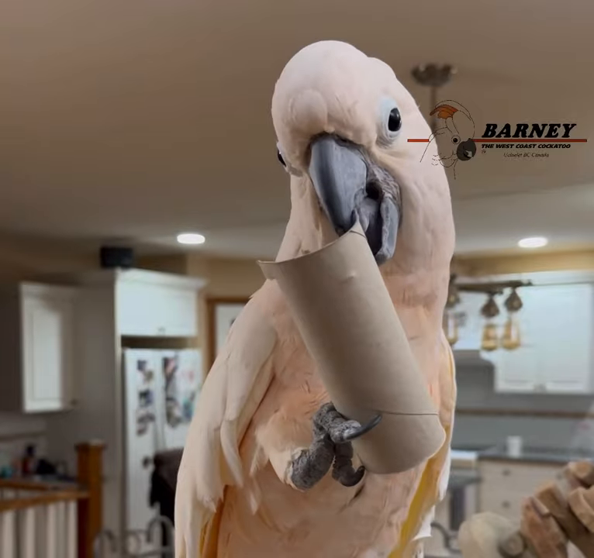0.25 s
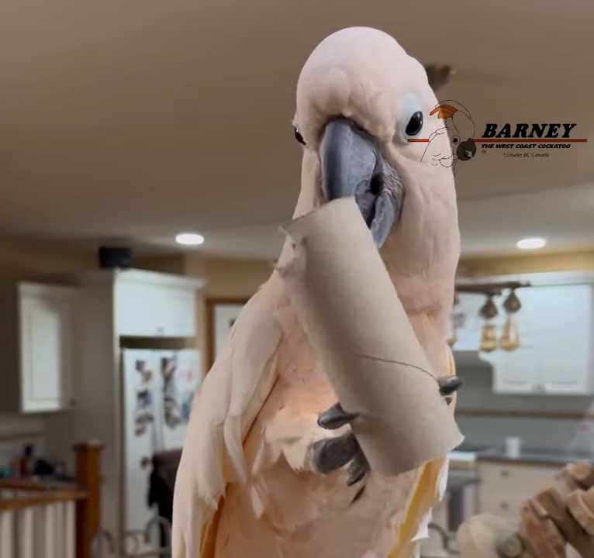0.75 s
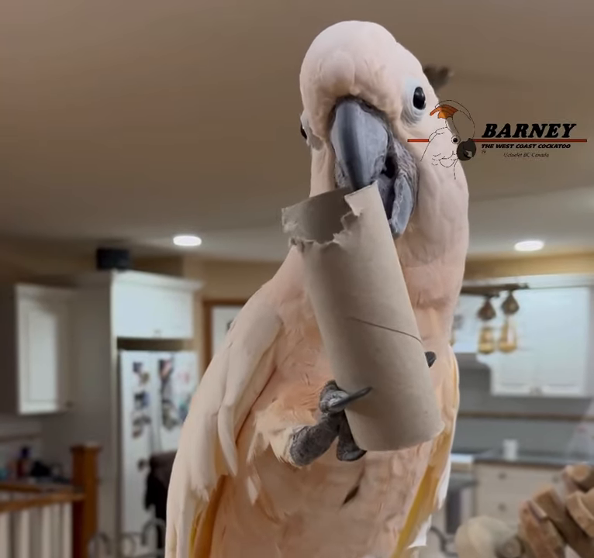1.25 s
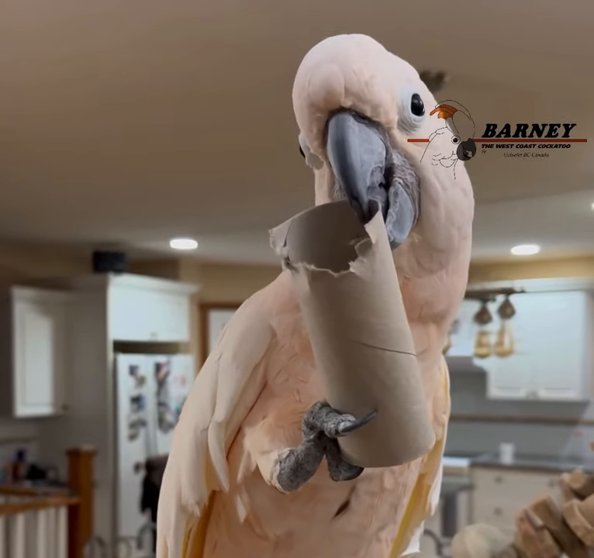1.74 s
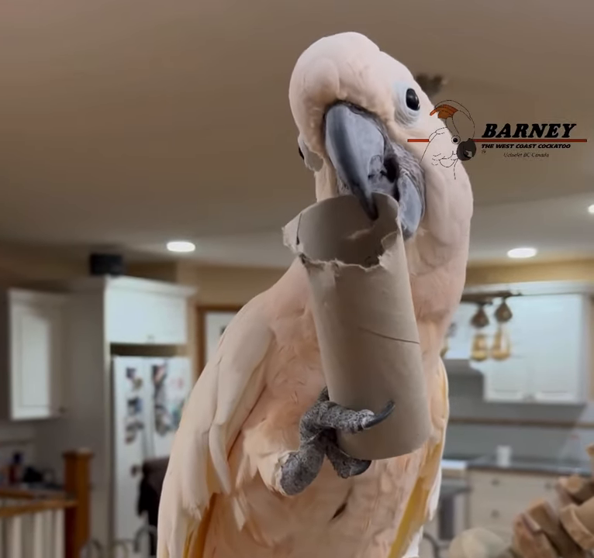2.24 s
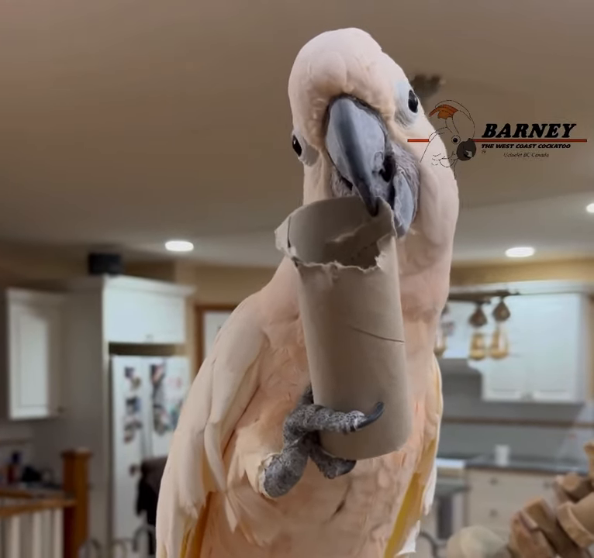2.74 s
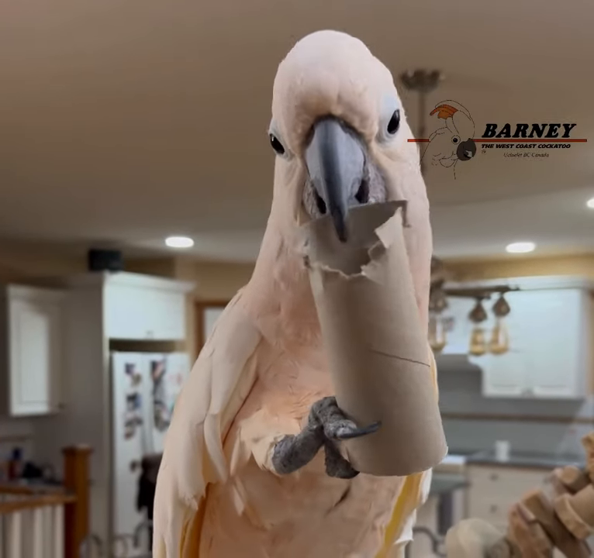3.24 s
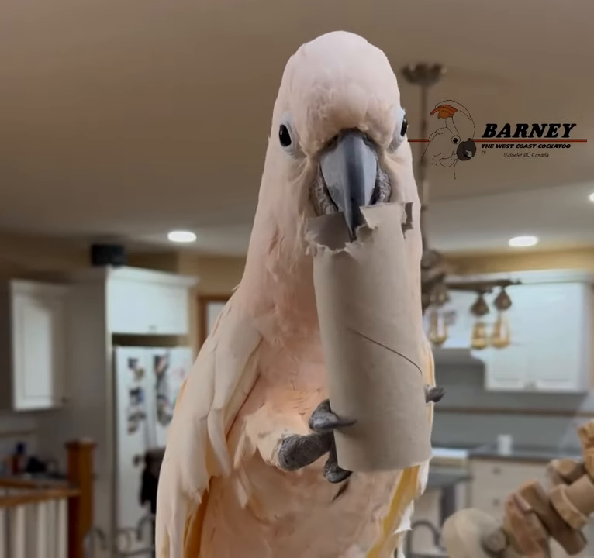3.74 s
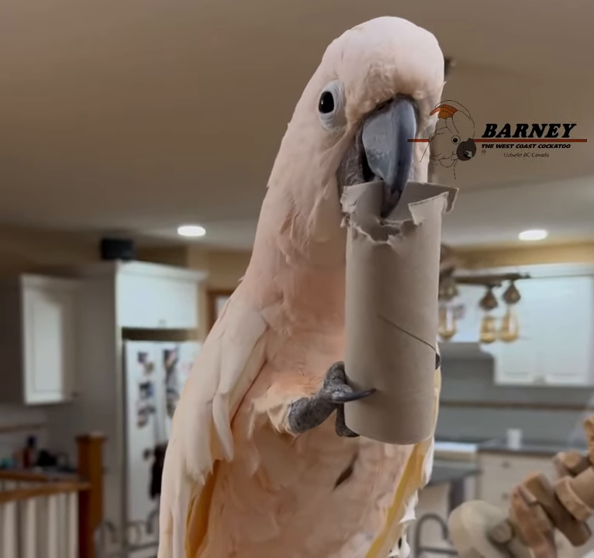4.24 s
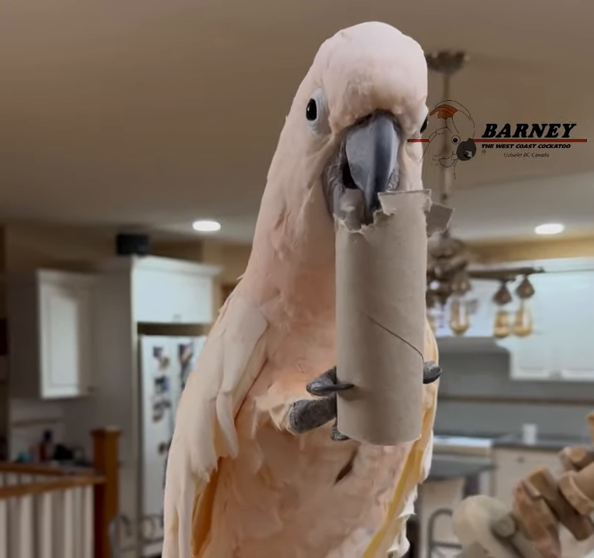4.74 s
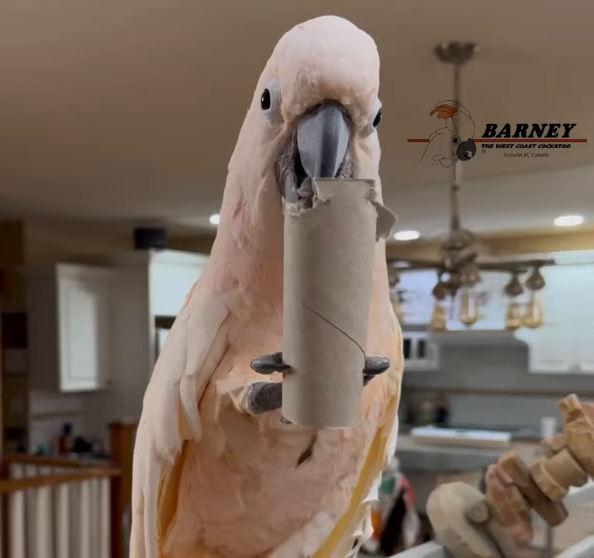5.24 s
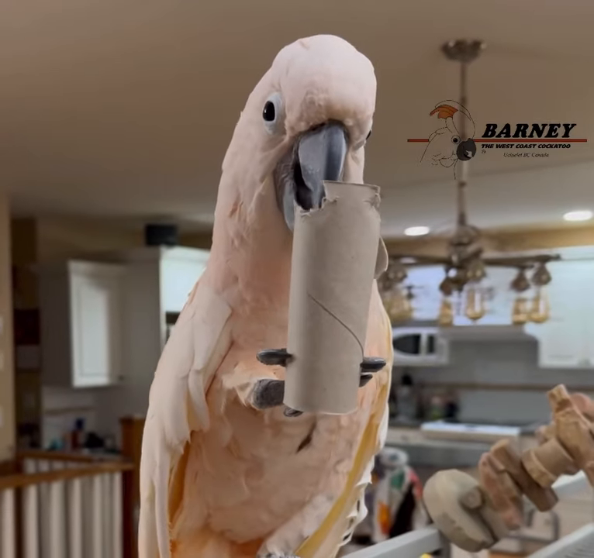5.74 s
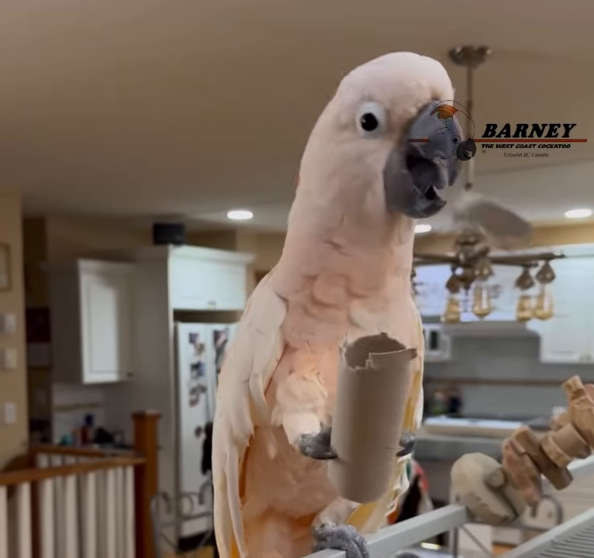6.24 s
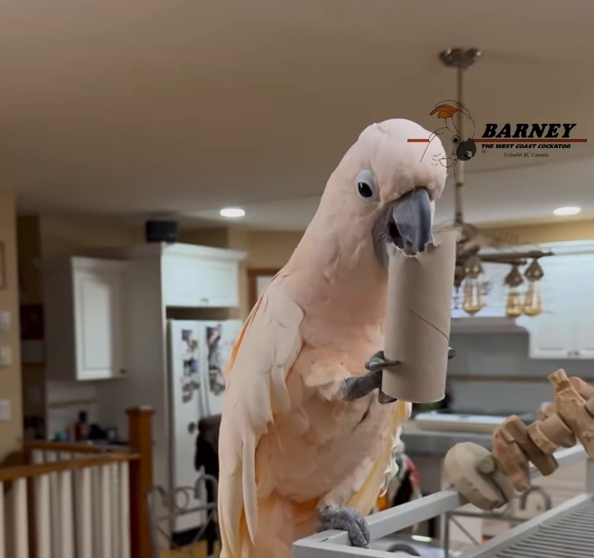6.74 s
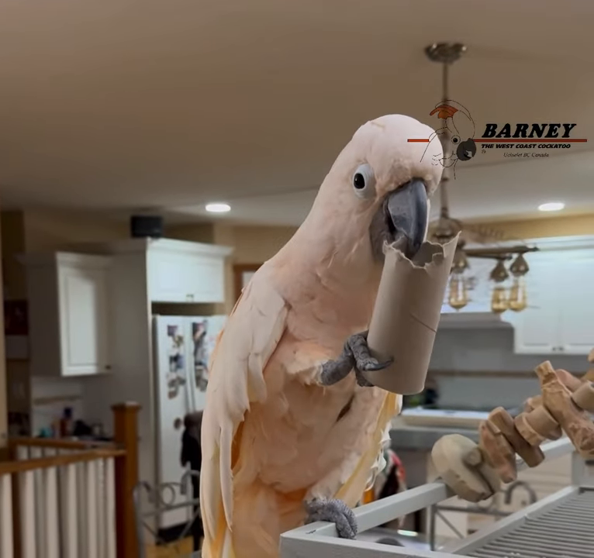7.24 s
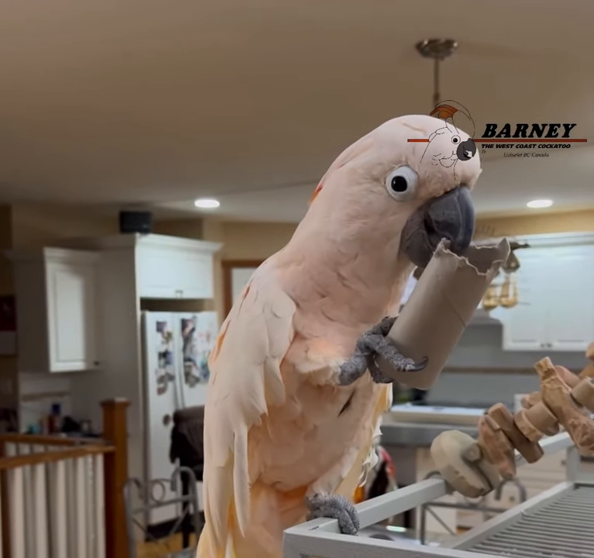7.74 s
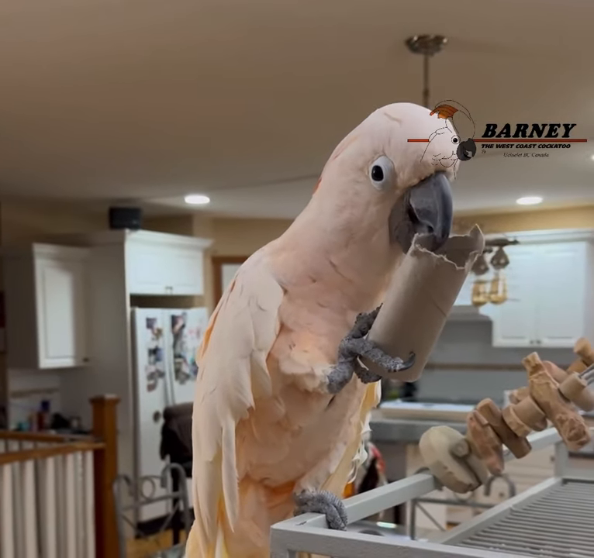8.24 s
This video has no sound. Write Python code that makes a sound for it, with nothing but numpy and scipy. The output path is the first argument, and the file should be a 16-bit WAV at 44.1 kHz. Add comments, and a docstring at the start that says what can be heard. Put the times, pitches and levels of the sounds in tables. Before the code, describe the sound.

A cockatoo chews the rim of a cardboard tube close to the microphone. Small hollow snaps and crunches come in uneven clusters, mixed with dry ticks, short beak scrapes and ripping paper fibres. About three seconds in, the tube caves in with one loud hollow pop, then the nibbling and tearing carry on. The kitchen adds a light echo and a low, steady hum of air.

```python
"""Crackling, crunching and hollow snaps: a cockatoo chews the rim of a cardboard tube in a kitchen.
As its beak pulls, nibbles and scrapes, paper fibres rip, the layers of card crunch and snap,
and the hollow tube rings along. Once, the wall of the tube caves in with a loud pop.
The kitchen echoes it all over a low hum of background air."""
import sys
import numpy as np
from scipy import signal
from scipy.fft import rfft, irfft, next_fast_len
from scipy.io import wavfile
from scipy.ndimage import uniform_filter1d

SR = 44100
rng = np.random.default_rng(int(sys.argv[2]) if len(sys.argv) > 2 else 0)


def bounce(signal):
    """Save signal as a 16-bit WAV file at the path given by the first command-line argument."""
    frames = np.transpose(np.atleast_2d(signal))
    limited = np.clip(frames, -1, 1)
    pcm = np.round(limited * 32767).astype(np.int16)
    wavfile.write(sys.argv[1], SR, pcm)


N = 373968
TIME = np.arange(N) / SR
LEFT_LAG_S = .00059  # sound from the bird's side reaches the left channel this much later

# snaps of the rim under the beak: (time [s], crack level [dB], tube ring level [dB])
RIM_SNAPS = [(.141, -64, -57.5), (0.3377, -55.5, -48), (0.51, -57, -51), (0.567, -46, -45),
             (0.5727, -54, -42), (.578, -59, -43), (0.583, -60, -43), (.619, -58, -47.5),
             (0.6876, -55, -46), (.704, -71, -50), (.73, -57, -43.5), (0.7384, -57, -44.5),
             (0.7802, -56, -56), (0.7854, -64, -48.5), (.824, -68, -54), (.858, -53.5, -52),
             (.952, -55, -52), (1.1476, -48, -55.5), (1.465, -68, -54.5), (1.9466, -32, -64),
             (2.003, -41.5, -51), (2.0115, -44.5, -52), (2.398, -47, -54.5), (2.528, -51, -58),
             (2.623, -49, -49), (2.63, -44, -48.5), (3.1142, -51.5, -49.5), (3.1346, -48, -48.5),
             (3.2697, -56, -48), (3.671, -62, -52), (3.7205, -53, -51), (3.768, -56.5, -55),
             (3.779, -54.5, -44.5), (3.9898, -42.5, -51.5), (3.994, -44, -54), (4.239, -29.5, -40.5),
             (4.2484, -48, -56), (4.348, -46.5, -54), (4.468, -73, -55.5), (4.711, -39, -41),
             (4.7135, -32, -41.5), (4.824, -65, -56), (5.239, -53, -52.5), (5.305, -48.5, -50.5),
             (5.457, -66, -53.5), (5.474, -64, -54.5), (5.8914, -46.5, -49), (5.8984, -45, -48.5),
             (5.915, -63, -54), (6.015, -42.5, -38.5), (6.038, -57, -51), (6.479, -59.5, -68),
             (6.668, -69, -49), (6.8885, -66.5, -57.5), (7.001, -41.5, -58.5), (7.0989, -46.5, -55),
             (7.358, -44.5, -59), (7.376, -44.5, -59), (7.621, -68, -53), (7.86, -57, -58),
             (7.914, -47, -60), (7.9319, -48, -53.5), (8.098, -55, -49.5), (8.402, -53, -53.5),
             (8.4241, -47, -63)]
# the tube's main note shifts as the beak squeezes and shortens it: (time [s], pitch [Hz])
TUBE_NOTE = [(0.7, 1275), (1.2, 1370), (2.6, 1437), (3.3, 1261), (3.7, 1393), (4.25, 1309), (4.72, 1449),
             (5.2, 1370), (6.0, 1362), (6.7, 1290), (7.5, 1386), (8.4, 1402)]
# tone of card being crushed: (frequency [Hz], level [dB])
CRUSH_TONE = [(100, -21.5), (250, -1), (600, 4.5), (1000, 1), (1900, -1), (2750, -0.5), (3500, -6),
              (5500, 0), (16000, -34.5)]


def gain_of(db):
    """Turns decibels into a factor to multiply a sound by."""
    return 10 ** (np.asarray(db) / 20)


def evened(x):
    """Scales a sound to an average power of 1."""
    return x / np.sqrt(np.mean(x ** 2) + 1e-20)


def burst(x):
    """Scales a short sound to the energy of 10 ms at power 1."""
    return evened(x) * np.sqrt(SR / 100 / x.shape[-1])


def read(points, hz):
    """Looks up a value between a table's rows, on a logarithmic frequency scale."""
    f, value = np.transpose(points)
    return np.interp(np.log(hz + 1), np.log(f + 1), value)


def colour(x, tone):
    """Turns each frequency up or down as a tone table says."""
    size = next_fast_len(x.shape[-1] + 512)
    gains = gain_of(read(tone, np.fft.rfftfreq(size, 1 / SR)))
    return irfft(rfft(x, size) * gains, size)[..., :x.shape[-1]]


def add(mix, s, sound):
    """Mixes a sound in, starting at s seconds."""
    part = mix[:, max(round(s * SR), 0):][:, :sound.shape[1]]
    part += sound[:, :part.shape[1]]


def pair(size, likeness):
    """Left and right hiss: unrelated at likeness 0, the same at 1."""
    a, b = rng.standard_normal((2, size))
    return np.array([a, likeness * a + np.sqrt(1 - likeness ** 2) * b])


def leaning(right_db):
    """Left and right gains that move a sound sideways and keep its total power."""
    return evened(gain_of([[-right_db / 2], [right_db / 2]]))


def air(drone_hz=74):
    """Steady low noise of the house, with a faint drone."""
    tone = [(24, -26), (48, -5.5), (80, 2.5), (110, -4), (250, 0.5), (340, -7.5), (650, -6.5), (900, -17),
            (3000, -31), (6000, -41), (15000, -39)]  # tone of the noise: (frequency [Hz], level [dB])
    sameness = [(70, 0.99), (280, 0.92), (640, 0), (2000, 0)]  # how alike left and right are: (frequency [Hz], likeness [0 to 1])
    a, b = rfft(rng.standard_normal((2, N)))
    likeness = read(sameness, np.fft.rfftfreq(N, 1 / SR))
    hiss = irfft(np.array([a, likeness * a + np.sqrt(1 - likeness ** 2) * b]), N)
    drone = np.sin(2 * np.pi * drone_hz * TIME)
    return gain_of(-57) * evened(colour(hiss, tone)) + gain_of(-72) * drone


def kitchen(x, size=30000):
    """The room answers with many small echoes, which die away at their own rate for each frequency."""
    fade_times = [(200, 0.3), (2000, 0.59), (7000, 0.72), (14000, 0.25)]  # how long the room rings: (frequency [Hz], time to fall 60 dB [s])
    echoes = rng.standard_normal((2, size)) * (rng.random((2, size)) < .15)
    echoes *= np.clip(TIME[:size] / .00068 - .5, 0, 1)
    hz, t, bands = signal.stft(echoes, SR, nperseg=256)
    fade = gain_of(-60 * t / read(fade_times, hz)[:, None])
    tail = signal.istft(bands * fade, SR, nperseg=256)[1]
    tail /= np.linalg.norm(tail[0])
    tail[:, round(.024 * SR)] += .25  # one clear echo from the ceiling
    return signal.fftconvolve(x, tail, axes=1)[:, :N]


def wall(x, share, ring_s=.0046, size=512):
    """The stiff card rings briefly at many close pitches, which depend on where the beak holds it."""
    ring = rng.standard_normal((2, size)) * np.exp(-TIME[:size] / ring_s)
    ring *= share / np.linalg.norm(ring[0])
    ring[:, 0] += 1  # the sound itself passes through too
    return signal.oaconvolve(x, ring, axes=1)[:, :x.shape[1]]


def regripping(x, count=5, grips_per_s=4.5):
    """The wall's ring changes as the beak moves from one grip to the next."""
    offsets = (TIME * grips_per_s - np.arange(count)[:, None]) % count - 1
    grips = np.cos(np.pi / 2 * np.clip(offsets, -1, 1))
    return sum(wall(x * grip, share=2.2) for grip in grips)


def tube(hz, right_db, damping=1, size=1024):
    """The hollow tube rings after a jolt: a few notes swell quickly and fade, the right side first."""
    # its notes: (pitch [times the main note], base width [Hz], level [dB], lean [-1 left to 1 right])
    notes = [(1.0, 178, 14.5, 1), (.77, 240, 2, 0.63), (1.2, 480, -6, 1), (2.04, 500, -5.5, 0.16)]
    t = np.maximum(TIME[:size] - np.array([[LEFT_LAG_S], [0]]), 0)
    ring = 0
    for ratio, width, db, lean in notes:
        decay = np.pi * width * damping  # a wider note dies sooner
        swell = decay ** 2 * t * np.exp(-decay * t)
        ring += gain_of(db) * leaning(right_db * lean) * swell * np.sin(2 * np.pi * ratio * hz * t)
    return ring


def fractures(per_s, spread_db, fade_s, clump_db, likeness):
    """Tiny breaks, each a short puff of hiss; they come in runs that start at once and die away."""
    sizes = gain_of(spread_db * np.minimum(rng.exponential(1, N), 3.5))
    breaks = sizes * (rng.random(N) < per_s / SR)
    power = signal.lfilter([1], [1, -np.exp(-1 / (fade_s * SR))], breaks ** 2)
    power /= abs(uniform_filter1d(power, size=900)) + 1e-9  # evens out the level over about 20 ms
    run_starts = 1. * (rng.random(N) < 70 / SR)
    runs = signal.lfilter([1], [1, -np.exp(-1 / (.012 * SR))], run_starts)
    return evened(np.sqrt(power) * gain_of(clump_db * np.tanh(runs)) * pair(N, likeness))


def scraping():
    """The edge of the beak sticks and slips on the card: short rasps that swell and fade."""
    strokes = [(1.418, 0.066, -58.5), (1.51, 0.097, -63), (6.597, 0.13, -69)]  # scrapes along the wall: (start [s], length [s], level [dB])
    tone = [(1200, -17), (2100, 1), (2650, 5), (3200, -13), (4500, -15)]  # tone of the rasp: (frequency [Hz], level [dB])
    slips = fractures(per_s=470, spread_db=2, fade_s=.00069, clump_db=3, likeness=.75)
    pressure = np.zeros((2, N))
    for start, length, db in strokes:
        arch = np.sin(np.pi * TIME[:round(length * SR)] / length)
        add(pressure, start, gain_of(db) * arch[None])
    return pressure * evened(colour(slips, tone))


def scuffing(start_s=7.3575, fade_s=.076, size=12000):
    """The rim skids across the beak: a low rasp that starts suddenly and runs out."""
    out = np.zeros((2, N))
    rasp = evened(colour(wall(pair(size, likeness=.37), share=.96), CRUSH_TONE))
    add(out, start_s, gain_of(-43.5) * rasp * np.exp(-(TIME[:size] / fade_s) ** 2))
    return out


def beak_work():
    """How hard the beak works the fibres, the layers and the tube at each moment, one row for each."""
    # the beak never quite rests: (fibres [dB], layers [dB], tube [dB])
    resting_db = [-78.5, -73, -85]
    # it pulls strips off the rim: (start [s], length [s], relative fibre level [dB], swell [dB])
    pulls = [(-.02, 0.064, -58, -24), (.136, 0.042, -53, -11), (1.116, 0.23, -54.5, 5.5),
             (1.91, .15, -55.5, 7), (2.273, 0.14, -49.5, 11.5), (2.434, 0.028, -50.5, 7),
             (2.752, 0.1, -56.5, 6), (2.837, .022, -47.5, 20), (3.93, 0.35, -58, 8),
             (4.72, 0.16, -54.5, -9), (5.129, .21, -61, 8), (5.685, .24, -60.5, -5), (5.919, .12, -51, 13),
             (6.999, .18, -59, 0), (7.14, 0.22, -60.5, 28), (7.775, 0.13, -63.5, 7),
             (7.901, 0.063, -49.5, -2), (8.265, .18, -53, 14)]
    # it bites and lets go: (start [s], length [s], relative crush level [dB], relative tube level [dB])
    nibbles = [(0.147, 0.082, -68, -50.5), (0.2, .2, -60, -61), (0.52, 0.087, -50.5, -48.5),
               (.72, 0.23, -64, -66), (0.897, 0.099, -58.5, -56), (1.39, .11, -60.5, -57.5),
               (1.506, 0.093, -59.5, -60), (1.636, .088, -65, -77), (2.107, 0.03, -55.5, -51.5),
               (2.15, 0.091, -60, -64), (2.467, .2, -60.5, -64), (2.84, 0.036, -50, -50),
               (3.563, 0.18, -64.5, -59), (4.231, 0.029, -48, -47), (4.872, .21, -64.5, -58.5),
               (5.179, .12, -63.5, -57), (5.374, 0.15, -62.5, -53), (5.58, .11, -66.5, -60.5),
               (5.937, 0.088, -57.5, -53.5), (6.254, 0.042, -66, -82), (6.589, 0.13, -67, -79),
               (6.717, 0.091, -71, -59.5), (6.983, 0.16, -58.5, -83.5), (7.393, 0.24, -66, -61),
               (7.562, .11, -62, -55), (7.998, 0.16, -59, -56), (8.267, .24, -67.5, -54)]
    # crackle around a snap, compared with that snap: (fibres [dB], layers [dB], tube [dB])
    strain_db = [-9, -12.5, -9]
    # the caved-in wall creaks and shudders as it settles: (fibres [dB], layers [dB], tube [dB])
    settling_db = [-53.5, -43, -35]
    grip_s, release_s = .014, .0089
    build_s, ease_s, settle_s = .0069, .0098, .058
    power = np.ones((3, N)) * gain_of(resting_db)[:, None] ** 2

    def stroke(start, levels_db, shape):
        """Adds the power of one movement to the three rows."""
        add(power, start, np.outer(gain_of(levels_db), shape) ** 2)

    for start, length, db, swell_db in pulls:
        t = TIME[:round((length + .15) * SR)]
        held = np.minimum(t / grip_s, 1) * np.exp(-np.maximum(t - length, 0) / release_s)
        force = held * gain_of(db + swell_db * (np.minimum(t / length, 1) - .5))
        stroke(start, [0, -17, -12], force)  # a pull mostly rips fibres
    for start, length, crush_db, shake_db in nibbles:
        arch = np.sin(np.pi * TIME[:round(length * SR)] / length)
        stroke(start, [crush_db, crush_db, shake_db], arch)
    t = TIME[:SR // 10] - .05  # time before and after a snap
    strain = np.exp(np.minimum(t / build_s, -t / ease_s))
    for s, crack_db, ring_db in RIM_SNAPS:
        bite_db = (crack_db + ring_db) / 2
        stroke(s + t[0], np.add([bite_db, bite_db, ring_db], strain_db), strain)
    stroke(2.865, settling_db, np.exp(-TIME[:SR // 2] / settle_s))
    return np.sqrt(power)


def chewing():
    """Fibres rip, layers of card crush and the tube rings under both, as hard as the beak works."""
    rip_tone = [(300, -35.5), (1500, -17), (3000, -13), (4900, -6), (6000, -3), (7200, -0.5), (9800, -4),
                (12000, -19), (15500, -7.5)]  # tone of ripping fibres: (frequency [Hz], level [dB])
    fine = fractures(per_s=1400, spread_db=0, fade_s=.00032, clump_db=11, likeness=.82)
    fine = evened(regripping(fine))
    # whole bundles of fibres part in single sharp ticks
    bundles = fractures(per_s=150, spread_db=3.5, fade_s=.0006, clump_db=5, likeness=.8)
    bundles = evened(wall(bundles, share=1.1))
    fibres = evened(colour(fine + .6 * bundles, rip_tone))
    crunch = fractures(per_s=300, spread_db=2.5, fade_s=.00082, clump_db=11.5, likeness=.71)
    layers = evened(colour(regripping(crunch), CRUSH_TONE))
    layers[0] = np.roll(layers[0], round(LEFT_LAG_S * SR))
    # the beak squeezes the tube out of round, so its pitch differs from jolt to jolt
    hz = np.interp(TIME, *np.transpose(TUBE_NOTE))
    ring = 0
    for squeeze in (.965, 1, 1.035):
        jolts = fractures(per_s=100, spread_db=5, fade_s=.00032, clump_db=13, likeness=.7)
        note = signal.hilbert(tube(hz.mean() * squeeze, right_db=10))
        ring += signal.oaconvolve(jolts, note, axes=1)[:, :N]
    drift = np.exp(2j * np.pi * np.cumsum(hz - hz.mean()) / SR)  # slides the ring along TUBE_NOTE
    ring = evened((ring * drift).real)
    rip, crush, shake = beak_work()
    return gain_of(2.13) * (rip * fibres + crush * layers) + gain_of(-2) * shake * ring


def ticking(rise_s=.00018, size=1024):
    """Thick fibres part with dry, bright ticks that leave the tube still."""
    ticks = [(.6876, -64), (.7805, -62), (1.1485, -43), (1.208, -49), (1.281, -50), (1.302, -45),
             (1.341, -45), (1.6065, -52.5), (1.9454, -34.5), (1.949, -42), (1.959, -42), (2.051, -44),
             (2.062, -44), (2.3405, -47), (2.382, -43), (2.3893, -47), (2.4407, -55), (2.748, -53.5),
             (2.8068, -46), (2.825, -47.5), (4.1917, -39.5), (4.2023, -51), (4.2185, -51), (5.2865, -44),
             (5.641, -57), (5.6475, -49), (5.7273, -53.5), (5.8067, -50), (5.981, -46), (5.992, -52),
             (7.03, -47.5), (7.315, -48), (7.802, -52), (7.812, -52), (7.8965, -52), (7.952, -47.5),
             (8.2455, -62), (8.334, -53)]  # each fibre that parts: (time [s], level [dB])
    tone = [(1000, -13), (4000, -8.5), (8000, 4), (11500, -3.5), (15500, 1)]  # tone of a tick: (frequency [Hz], level [dB])
    out, age = np.zeros((2, N)), TIME[:size] / rise_s
    for s, db in ticks:
        puff = wall(age * np.exp(-age) * pair(size, likeness=.52), share=.96)
        add(out, s, gain_of(db) * burst(colour(puff, tone)))
    return out


def flexing(flex_s=.0007):
    """The wall bends and gives a short, woody note where it folds."""
    folds = [(2.8667, -38.5, 2740), (4.2393, -44.5, 4030), (6.015, -56.5, 2700)]  # each fold: (time [s], relative level [dB], pitch [Hz])
    out, t = np.zeros((2, N)), TIME[:SR // 20]
    for s, db, hz in folds:
        note = burst(t * np.exp(-t / flex_s) * np.sin(2 * np.pi * hz * t))
        add(out, s, gain_of(db) * note * leaning(right_db=-10))
    return out


def knocking(fade_cycles=1.4):
    """Firm bites jolt the whole tube with a dull knock."""
    bites = [(1.946, -44.5, 587), (2.866, -45.5, 184), (2.867, -40.5, 673), (4.24, -50.5, 690),
             (5.559, -61, 710), (6.016, -47, 264), (7.001, -58, 910)]  # each firm bite: (time [s], level [dB], pitch [Hz])
    out, t = np.zeros((2, N)), TIME[:SR // 20]
    for s, db, hz in bites:
        knock = burst(np.exp(-t * hz / fade_cycles) * np.sin(2 * np.pi * hz * t))
        add(out, s, gain_of(db) * knock[None])
    return out


def snap(rise_s, crack_db, ring_db, hz, right_db, roughness, wall_share, damping, size=2048):
    """A layer of card gives way: a quick rush of breaks in the wall, and a jolt that rings the tube."""
    age = TIME[:size] / max(rise_s, 1e-4)
    breaks = age * np.exp(-age) * pair(size, likeness=.26)
    tone = [(80, -20), (200, -10), (700, -9.5), (2800, 2.5), (3500, -3.5), (5000, 6), (6900, 7.5),
            (9800, 3.5), (15500, -4)]  # tone of the crack: (frequency [Hz], level [dB])
    crack = burst(colour(wall(breaks, share=wall_share), tone))
    jolt = roughness * breaks / np.linalg.norm(breaks[0])
    jolt[:, 0] += 1  # one clean kick at the start
    ring = burst(signal.fftconvolve(jolt, tube(hz, right_db, damping), axes=1)[:, :size])
    return gain_of(crack_db) * crack + gain_of(ring_db) * ring


def snapping(slowest_rise_s=.0024, detune=.033):
    """The rim snaps again and again, catching the tube at a slightly different pitch each time."""
    out = np.zeros((2, N))
    for s, crack_db, ring_db in RIM_SNAPS:
        hz = np.interp(s, *np.transpose(TUBE_NOTE)) * (1 + detune * rng.uniform(-1.1, 1))
        # the more a snap rings rather than cracks, the slower the layer gives way
        rise_s = slowest_rise_s * 2 ** (min(ring_db - crack_db, 0) / 9)
        sound = snap(rise_s, crack_db, ring_db, hz, right_db=7.5, roughness=1, wall_share=1, damping=1.93)
        add(out, s, sound)
    return out


def buckling(start_s=2.8669, linger_hz=1370, linger_s=.62):
    """The wall caves in at once with a dull crack and a clean hollow pop, and a faint note lingers."""
    tone = [(5000, 1.5), (6700, 3.5), (9000, -4)]  # tone of the pop: (frequency [Hz], level [dB])
    out, t = np.zeros((2, N)), TIME[:SR // 2]
    pop = snap(rise_s=.00029, crack_db=-29, ring_db=-18, hz=1335, right_db=19,
               roughness=.049, wall_share=.45, damping=.85)
    add(out, start_s, colour(pop, tone))
    note = gain_of(-42 - 60 * t / linger_s) * np.sin(2 * np.pi * linger_hz * t)
    add(out, start_s, note[None])
    return out


def scene():
    """The bird and its tube in the kitchen."""
    chew = chewing() + scuffing() + scraping()
    snaps = snapping() + knocking() + ticking()
    bends = buckling() + 2 * flexing()
    # the pop and the folds fill the room evenly from both sides
    into_room = gain_of(-6) * chew + gain_of(-10.5) * snaps + gain_of(-9.5) * bends.mean(0)
    return chew + snaps + bends + kitchen(into_room) + air()


def record(dry, cutoff_hz=16200):
    """Two microphone openings fall out of step in the high treble, and the very top is cut off."""
    common_tone = [(3800, 1), (4800, -4.5), (6000, -1), (8000, 0), (10300, 6), (12000, 1.5), (15300, 2)]  # what both hear alike: (frequency [Hz], level [dB])
    opposed_tone = [(3000, 1.5), (4700, 1), (6400, -15), (8500, -12.5), (10300, -4.5), (12500, -37),
                    (15300, -12)]  # what they hear in opposite ways: (frequency [Hz], level [dB])
    left_lead = [(6800, 0), (10000, -2.05), (11800, -3.08), (13600, -3.17), (15300, -3.7)]  # how far the left one leads: (frequency [Hz], phase [radians])
    mid = colour((dry[0] + dry[1]) / 2, common_tone)
    side = colour((dry[0] - dry[1]) / 2, opposed_tone)
    turn = np.exp(.5j * read(left_lead, np.fft.rfftfreq(N, 1 / SR)))  # half the phase for each side
    channels = irfft(np.array([rfft(mid + side) * turn, rfft(mid - side) / turn]), N)
    treble_cut = signal.firwin(511, cutoff_hz, window=("kaiser", 9), fs=SR)
    return signal.oaconvolve(channels, treble_cut[None], "same")


dry = scene()
out = record(dry)
bounce(out)
```